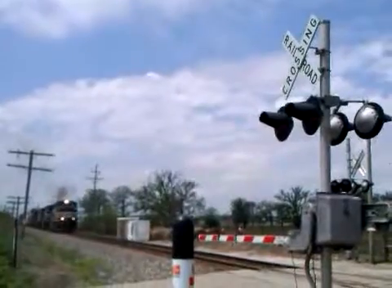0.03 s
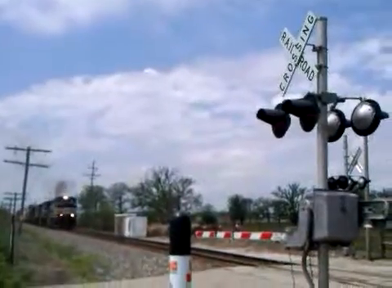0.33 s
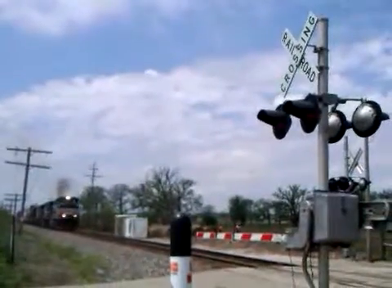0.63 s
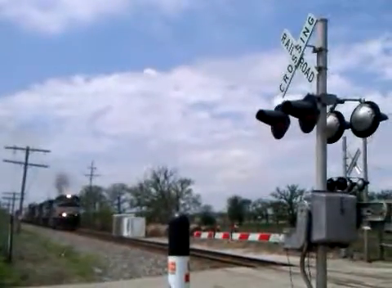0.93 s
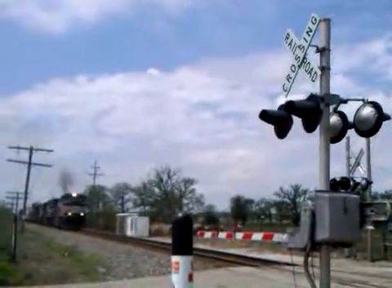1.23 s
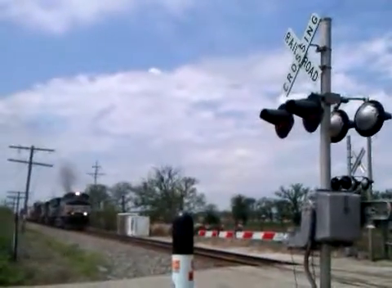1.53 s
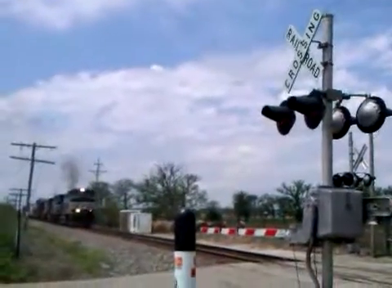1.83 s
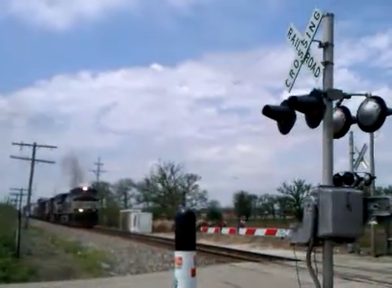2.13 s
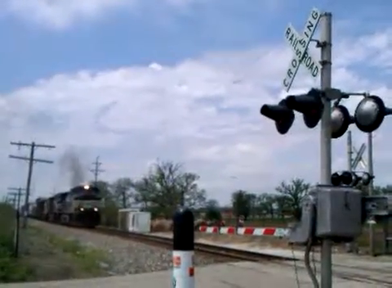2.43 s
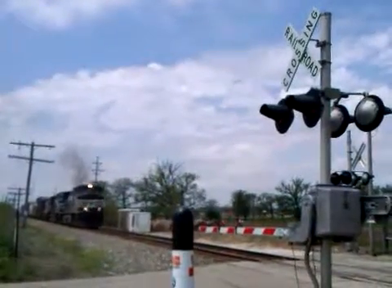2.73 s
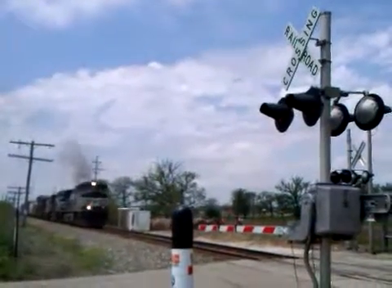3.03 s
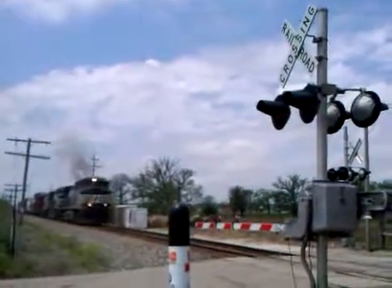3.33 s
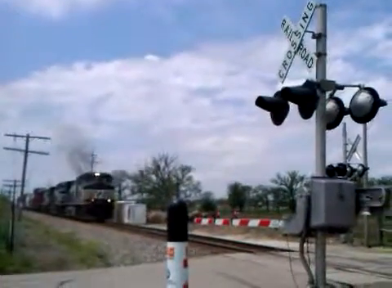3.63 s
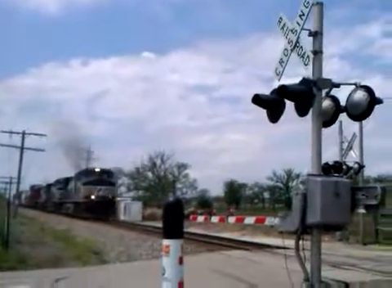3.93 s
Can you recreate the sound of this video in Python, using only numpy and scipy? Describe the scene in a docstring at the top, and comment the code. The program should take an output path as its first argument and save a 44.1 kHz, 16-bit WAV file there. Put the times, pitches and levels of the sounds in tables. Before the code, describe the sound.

A freight train's horn holds a loud chord and cuts off, echoing across open country. The approaching diesel's quieter rumble and thumping then slowly grow, with hissing rails and a faint bell, heard from beside a road crossing.

```python
"""A freight train's five-chime horn, heard from beside a level crossing in open country. Its reeds hold
a chord and stop; echoes from trees and from far down the line hang on, lower in pitch. The nearing diesel
thumps once a cycle over its rumble, the rails hiss ahead of the wheels and a swinging bell rings faintly.
One narrow-band microphone takes it all in."""
import sys
import numpy as np
from scipy import signal
from scipy.fft import rfft, irfft
from scipy.io import wavfile
from scipy.ndimage import map_coordinates

SR = 44100
rng = np.random.default_rng(int(sys.argv[2]) if len(sys.argv) > 2 else 0)


def persist_wave(psi):
    """Save psi, clipped to +-1, as 16-bit WAV."""
    counts = np.round(np.clip(psi, -1, 1) * 32767).astype(np.int16)
    wavfile.write(sys.argv[1], SR, np.atleast_2d(counts).T)


N = 176400
HORN_STOP_S, CYCLE_HZ, TOP_HZ = .685, 8.967, 7250  # end of the blast, engine cycle rate, treble limit


def undb(db):
    """Decibels to gain."""
    return 10 ** (np.asarray(db) / 20)


def level(x, db):
    """Scale to an rms level."""
    return x * undb(db) / np.sqrt(np.mean(x ** 2))


def curve(table, col=1):
    """One column of a time table, joined by straight lines."""
    rows = np.array(table, float)
    return np.interp(np.arange(N) / SR, rows[:, 0], rows[:, col])


def at_hz(points, hz):
    """Read a spectrum on a log-frequency axis."""
    rows = np.array(points, float)
    return np.interp(np.log(np.maximum(hz, 1)), np.log(rows[:, 0]), rows[:, 1])


def colour(x, points):
    """Filter by a spectrum of (f/Hz, gain/dB) points."""
    return irfft(rfft(x) * undb(at_hz(points, np.fft.rfftfreq(N, 1 / SR))), N)


def noise(points, db):
    """Noise with a given spectral shape and rms level."""
    return level(colour(rng.standard_normal(N), points), db)


def walk(per_s):
    """Random drift with per_s turns a second; spread near 1."""
    place = np.arange(N) / SR * per_s
    turns = int(place[-1]) + 2
    return np.interp(place, np.arange(turns), rng.standard_normal(turns))


def cut(x, hz, kind, order=2):
    """Low-pass or high-pass."""
    return signal.sosfilt(signal.butter(order, hz, kind, fs=SR, output="sos"), x)


def until(t, stop_s, fade_s):
    """Full level that fades out around a stop time."""
    return np.clip(.5 + (stop_s - t) / fade_s, 0, 1)


def bell(t):
    """A faint swinging bell: a close pair of partials beats, its pitch a little different on each swing."""
    strokes = [(.99, 2240, -65), (1.345, 2216, -55.5), (1.79, 2250, -52), (2.145, 2210, -53.5),
               (2.59, 2204, -54.5), (2.755, 2255, -62.5), (3.39, 2250, -62.5)]  # t/s, f/Hz, level/dB
    attack_s, t60_s, split_hz, twin_db = .008, .62, 16, -11
    out = np.zeros(N)
    for start, hz, db in strokes:
        age = np.maximum(t - start, 0)
        ring = np.minimum(age / attack_s, 1) * np.exp(-np.log(1000) * age / t60_s)
        phase = 2 * np.pi * hz * age + .85 * walk(per_s=60)
        twin = undb(twin_db) * np.sin(phase - 2 * np.pi * split_hz * age + walk(per_s=30))
        out += undb(db + walk(per_s=50)) * ring * np.sqrt(2) * (np.sin(phase) + twin)
    return out


def track():
    """Wheels roar in the distance and the rails carry a bright hiss ahead of them to the crossing."""
    wheel_shape = [(300, -3.5), (450, -2.5), (680, 5), (850, -0.5), (1100, 0), (1500, -4.5), (1900, -2),
                   (2150, -0.5), (2600, -12.5), (3200, -7.5), (4000, 3), (7000, -17.5)]  # rolling roar: f/Hz, level/dB
    rail_shape = [(2800, -17), (3500, -16.5), (3950, -11), (4250, 1), (4850, 1.5), (5500, -6), (6400, -5.5),
                  (7200, -19)]  # rail hiss: f/Hz, level/dB
    approach = [(0, -6, -1), (.7, -1.5, -6), (1.2, -6.5, -6.5), (1.5, -2, -5), (1.73, -3.5, -2.5),
                (1.9, 0.5, 0), (2.15, -1, 2.5), (2.45, -0.5, 2), (2.7, 3, 0), (2.92, -1, 5), (3.1, 0, 1),
                (3.4, -0.5, 2.5), (3.7, 1, 0.5), (4, 0.5, -0.5)]  # t/s, wheel gain/dB, rail gain/dB
    near_shape = [(1500, -19), (2300, -7.5), (2900, -2.5), (3500, -2), (4500, -23.5)]  # upper-mid hiss as the locomotive draws near: f/Hz, level/dB
    near_rise = [(0, -81.5), (3.3, -78.5), (3.6, -62.5), (3.8, -60), (4, -64)]  # its late rise: t/s, level/dB
    wheels = noise(wheel_shape, db=-57) * undb(curve(approach, col=1) + walk(per_s=12))
    rails = noise(rail_shape, db=-51.5) * undb(curve(approach, col=2) + .5 * walk(per_s=20))
    return wheels + rails + noise(near_shape, db=0) * undb(curve(near_rise))


def exhaust(cycle, age):
    """One heavy puff a cycle: the stack rings briefly and a low gust of gas follows."""
    gust_shape = [(20, -18), (35, 3.5), (55, -4), (85, 1), (112, -10.5), (140, -8.5), (220, -35.5)]  # f/Hz, level/dB
    stack_hz, stack_decay_s, gust_decay_s = 52, .011, .021
    strength = undb(.4 * rng.standard_normal(int(cycle[-1]) + 2))[cycle.astype(int)]
    puffs = strength * np.exp(-age / stack_decay_s) * np.cos(2 * np.pi * stack_hz * age)
    thumps = cut(cut(puffs, 10, "high", order=1), 280, "low", order=4)
    gusts = colour(rng.standard_normal(N) * np.exp(-age / gust_decay_s), gust_shape)
    return level(thumps, db=-48) + level(gusts, db=-59)


def cylinders(t, age):
    """Firing tones and knock at multiples of the cycle rate, over rumble; all surge just after a puff."""
    firing = [(9, -58), (12, -57.5), (13, -61.5), (16, -64)]  # multiple of the cycle rate, level/dB
    knock = [(150, -73.5), (180, -70), (225, -68.5), (265, -66), (320, -77), (360, -75.5)]  # outline of the higher multiples: f/Hz, level/dB
    rumble_shape = [(20, -22.5), (40, 6.5), (70, -11), (110, -3), (170, -1.5), (245, -8), (325, -7.5),
                    (420, -22.5), (600, -49.5)]  # f/Hz, level/dB
    surge_peak_s = .035
    tones = np.zeros(N)
    for k, db in firing + [(k, at_hz(knock, k * CYCLE_HZ)) for k in range(17, 40)]:
        tone = np.sin(2 * np.pi * (k * CYCLE_HZ * t + rng.random()))
        tones += level(tone * undb(2 * walk(per_s=3)), db)
    surge = 1 + .5 * age / surge_peak_s * np.exp(2 - 2 * age / surge_peak_s)
    return level(surge, db=0) * (tones + noise(rumble_shape, db=-55))


def whine(t):
    """The locomotive's faint whine, wavering in phase and level."""
    partials = [(646, -74), (770, -75), (1066, -74.5), (2130, -75)]  # f/Hz, level/dB
    out = np.zeros(N)
    for hz, db in partials:
        tone = np.sin(2 * np.pi * hz * t + .61 * walk(per_s=30))
        out += level(tone * undb(2.2 * walk(per_s=12)), db)
    return out


def engine(t):
    """The diesel up the line: its level dips, then grows as it nears the microphone."""
    approach = [(0, -7.5, -7.5), (.45, -10.5, -8.5), (.8, -18.5, -12), (1.15, -10, -7), (1.4, -7, -1),
                (1.7, -5, -0.5), (2.1, -4.5, 0), (2.5, -0.5, 2.5), (2.9, -3, 1.5), (3.3, -2, 1.5),
                (4, 1.5, 3.5)]  # t/s, exhaust gain/dB, cylinder and whine gain/dB
    first_puff_s = .0144
    cycle, age = np.divmod(t - first_puff_s, 1 / CYCLE_HZ)
    puffs = exhaust(cycle, age) * undb(curve(approach, col=1))
    return puffs + (cylinders(t, age) + whine(t)) * undb(curve(approach, col=2))


def scatter(x):
    """Wind and foliage shift the paths: each third-octave wavers in level and phase, the treble most."""
    spectrum, out = rfft(x), np.zeros(N)
    octave = np.log2(np.maximum(np.fft.rfftfreq(N, 1 / SR), 1))
    for hz in 250 * 2 ** (np.arange(16) / 3):
        window = np.clip(1 - 3 * abs(octave - np.log2(hz)), 0, 1)
        band = np.fft.ifft(2 * spectrum * window, N)  # complex, so the drift also turns its phase
        depth = .33 * np.sqrt(hz / 1000)
        drift = walk(per_s=17) + 1j * walk(per_s=23) + .5 * (walk(per_s=70) + 1j * walk(per_s=80))
        out += (band * (1 + depth * drift)).real / np.sqrt(1 + depth ** 2)
    return out


def echoes(t, sound, paths, build_s, early_db):
    """Duller copies that swell and outlast the horn, flatter as the train moves away from the reflectors."""
    out = np.zeros(N)
    for delay_s, flat_cents, db, edge_hz, fade_s in paths:
        ratio = 2 ** (-flat_cents / 1200)
        echo = map_coordinates(sound, [t * ratio * SR], order=2, mode="mirror")
        stop_s = HORN_STOP_S + delay_s
        early = np.clip((stop_s - t) / build_s - 1, 0, 1)
        out += cut(echo, edge_hz, "low", order=1) * undb(db + early_db * early) * until(t, stop_s, fade_s)
    return out


def countryside(t, blast):
    """The horn comes back from three distances, and its rush of air returns softly from the foliage."""
    # echo paths: end delay/s, pitch drop/cents, gain/dB, treble edge/Hz, fade/s
    near_paths = [(0.174, 2.3, -2.5, 3200, 0.12), (.35, 7, -9, 1580, 0.23)]  # close by
    tree_paths = [(0.531, 20, -10, 5030, 0.13), (.70, 22, -15.5, 1500, .17)]  # trees beside the line
    far_paths = [ (.69, 79, -12, 2200, .2), (1.0, 80, -22, 1200, .2), ]  # far down the line
    tree_colour = [(300, -20), (400, 3), (440, 0), (520, 3), (650, -11), (798, -1), (877, 10), (1020, 5),
                   (1190, -3.5), (1320, 7.5), (1600, -5.5), (1950, -8), (2200, -1.5), (2550, 5.5),
                   (3150, 12.5), (3700, -7), (6000, 4.5)]  # the way past the trees: f/Hz, gain/dB
    far_colour = [(300, -26), (440, -10), (520, -1), (650, -7), (798, 5), (877, -2.5), (1020, -1),
                  (1197, 2), (1330, -9), (1600, -2), (1750, -10), (2000, 5.5), (2200, -3), (2600, 3.5),
                  (6000, -0.5)]  # the long way over the ground: f/Hz, gain/dB
    swell_shape = [(1500, -26), (2100, -3), (2500, -1), (3150, 1), (3500, -15), (4500, -28)]  # returning rush of air: f/Hz, level/dB
    swell_s, swell_width_s = 1.12, .089
    near = echoes(t, blast, near_paths, build_s=.13, early_db=-28.5)
    trees = echoes(t, colour(blast, tree_colour), tree_paths, build_s=.2, early_db=-8)
    far = echoes(t, colour(blast, far_colour), far_paths, build_s=.23, early_db=-4)
    swell = noise(swell_shape, db=-59.5) * np.exp(-((t - swell_s) / swell_width_s) ** 2)
    return near + scatter(trees + far) + swell


def chord():
    """Five reeds buzz in their bells; moving air makes each overtone flutter on its way to the crossing."""
    chimes = [(327.84, -42, 0.00089), (398.4, -40, 0.0021), (438.7, -48, 0.0014), (508.2, -48, 0.0033),
              (643.4, -44.5, .004)]  # f/Hz, level/dB, rasp/share of the pitch
    overtones = [
        [(1, -7.5), (2, 0.5), (3, -15.5), (4, -18.5), (5, -15.5), (6, -13.5), (7, -20)],
        [(1, -16.5), (2, -1), (3, -8), (4, -14.5), (5, -27.5), (6, -23.5), (7, -27)],
        [(1, 1.5), (2, -3.5), (3, -12.5), (4, -3), (5, -9), (6, -27), (7, -18)],
        [(1, -3.5), (2, -1.5), (3, -7.5), (4, -6.5), (5, -18), (6, -32)],
        [(1, 0), (2, -12.5), (3, -15), (4, -19.5)],
    ]  # one list a chime: multiple, level/dB relative to the chime
    brass = [(2400, -70.5), (2700, -71), (3200, -71.5), (3600, -64), (4100, -70.5), (4390, -59.5),
             (4550, -75), (4800, -63.5), (5300, -70.5), (6200, -72.5), (7200, -84)]  # brassy overtones above those lists, for all chimes: f/Hz, level/dB
    air_shape = [(200, -27), (330, 9.5), (560, -17.5), (680, -30.5), (1000, 9.5), (1400, 5.5), (1950, 0.5),
                 (2700, -4), (4500, -6.5), (7000, -30)]  # air rushing through the horn: f/Hz, level/dB
    waver, flicker_db, grit = .00073, 2.8, .2  # slow pitch drift; slow and fast fading at 1.5 kHz
    out = noise(air_shape, db=-53)
    for (hz, db, rasp), partials in zip(chimes, overtones):
        pitch = hz * (1 + waver * walk(per_s=9) + rasp * walk(per_s=160))
        phase = 2 * np.pi * np.cumsum(pitch) / SR
        for k in range(1, int(TOP_HZ / hz) + 1):
            own_db = db + partials[k - 1][1] if k <= len(partials) else at_hz(brass, k * hz)
            height = min(k * hz / 1500, 1.5)  # higher overtones flutter more
            fading = undb(flicker_db * height * walk(per_s=8)) * (1 + grit * height ** 2 * walk(per_s=90))
            out += np.sqrt(2) * undb(own_db) * fading * np.sin(k * phase + rng.uniform(0, 2 * np.pi))
    return out


def horn(t):
    """The direct blast sags very slightly and is cut off, leaving its echoes over the open country."""
    sag_db_per_s = .5
    blast = chord()
    sag = undb(-sag_db_per_s * (t - HORN_STOP_S / 2))
    return blast * sag * until(t, HORN_STOP_S, fade_s=.018) + countryside(t, blast)


def scene():
    """Everything as heard from one spot beside the crossing."""
    t = np.arange(N) / SR
    return (horn(t) + engine(t) + track() + bell(t))[None]


def record(dry):
    """A small camera's microphone with a steep treble cut."""
    return signal.sosfilt(signal.ellip(10, .2, 70, TOP_HZ, fs=SR, output="sos"), dry)


dry = scene()
out = record(dry)
persist_wave(out)
```